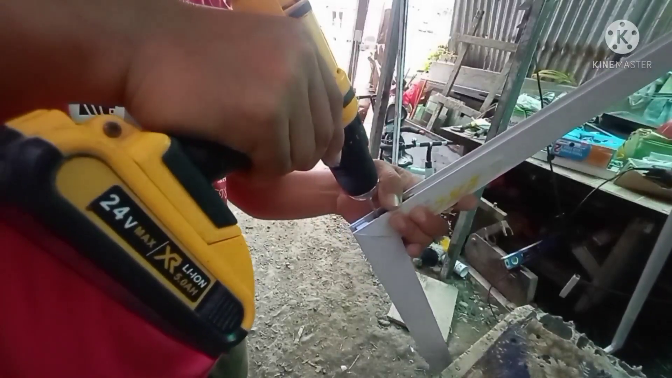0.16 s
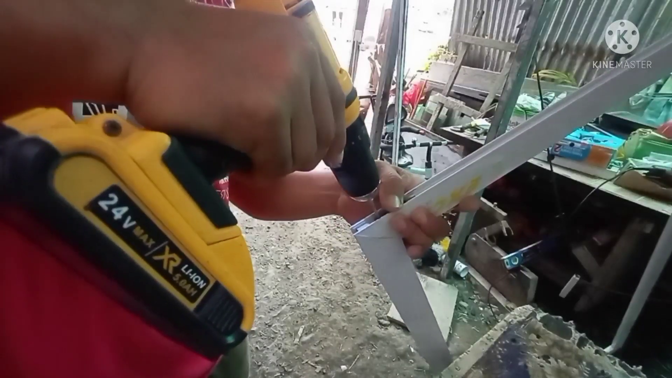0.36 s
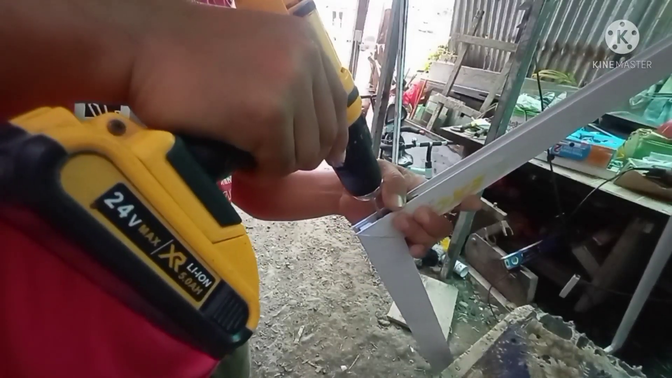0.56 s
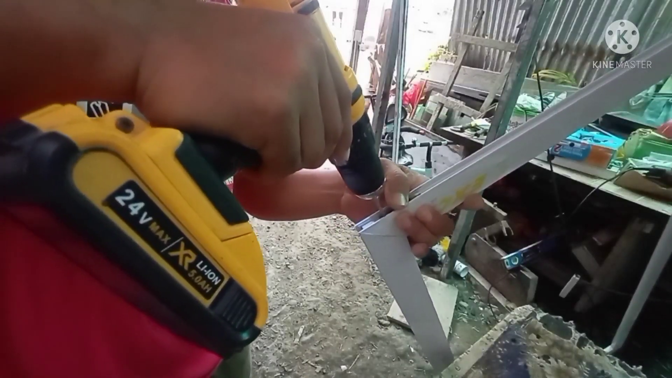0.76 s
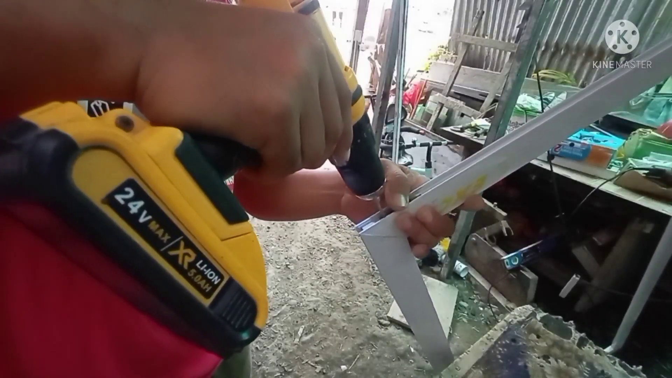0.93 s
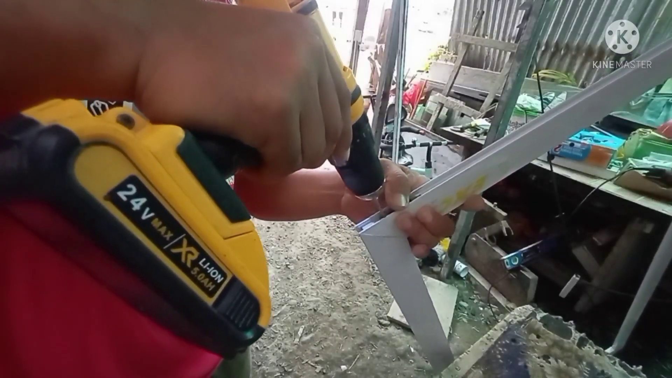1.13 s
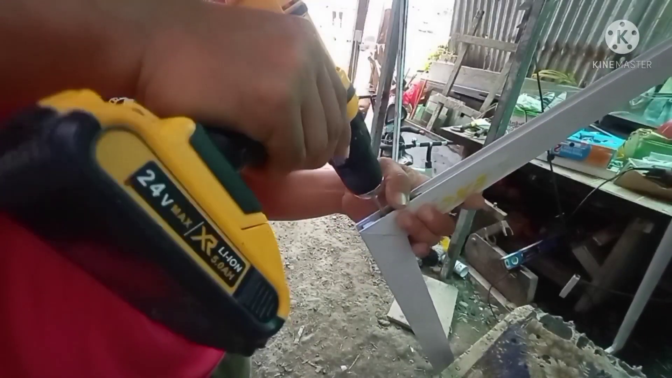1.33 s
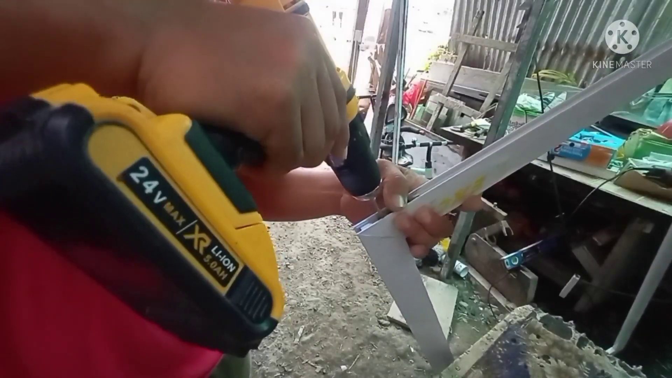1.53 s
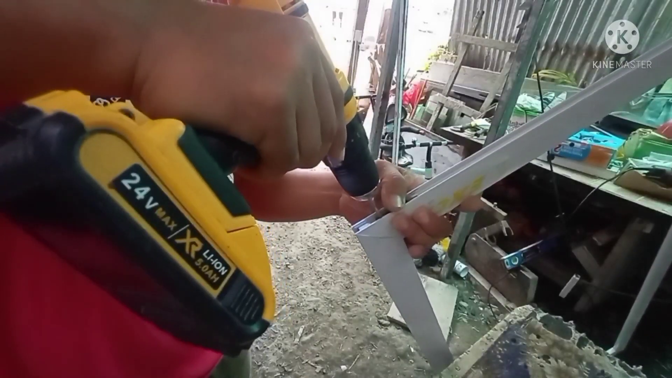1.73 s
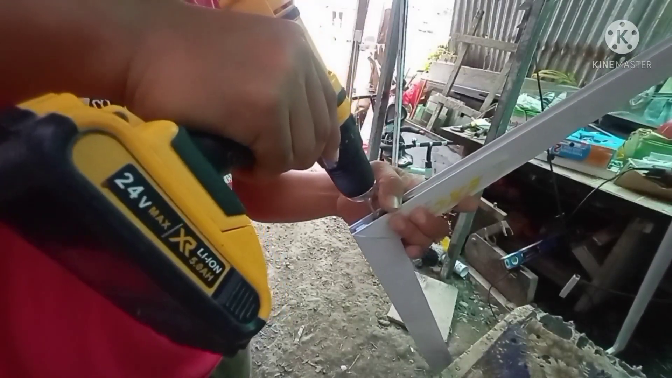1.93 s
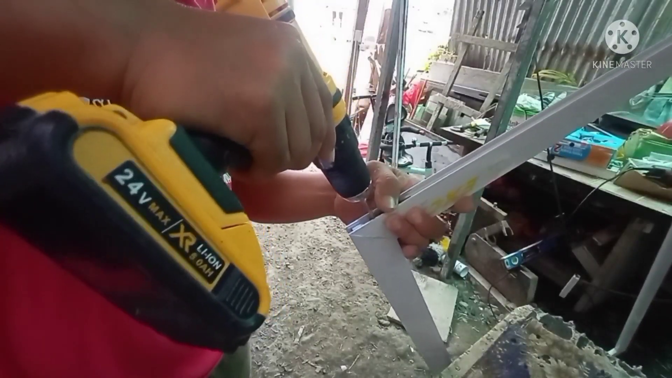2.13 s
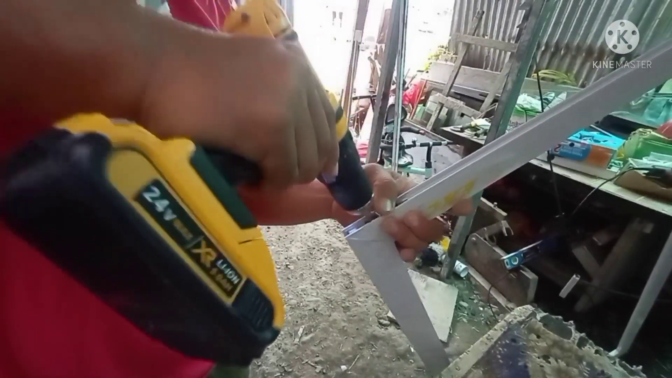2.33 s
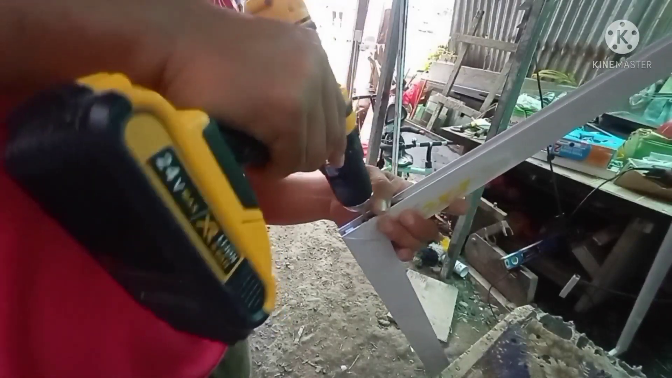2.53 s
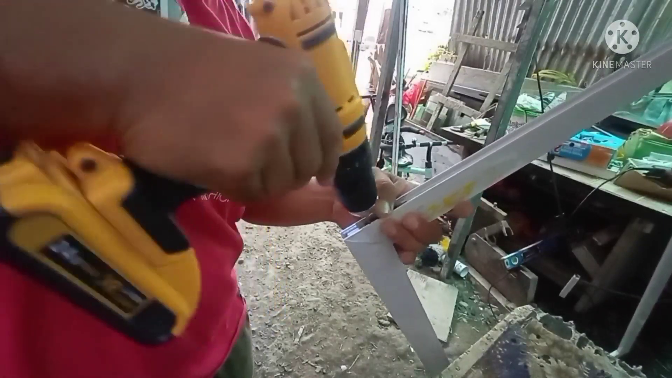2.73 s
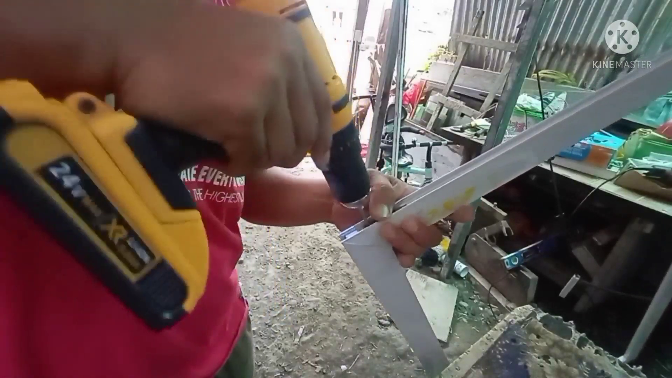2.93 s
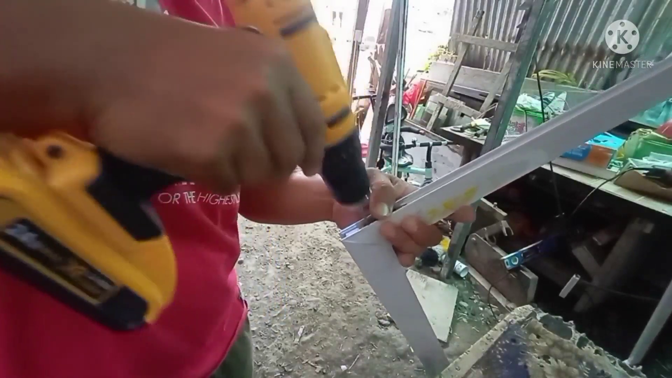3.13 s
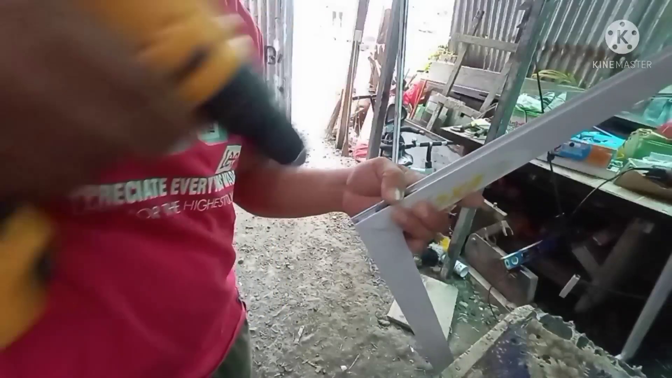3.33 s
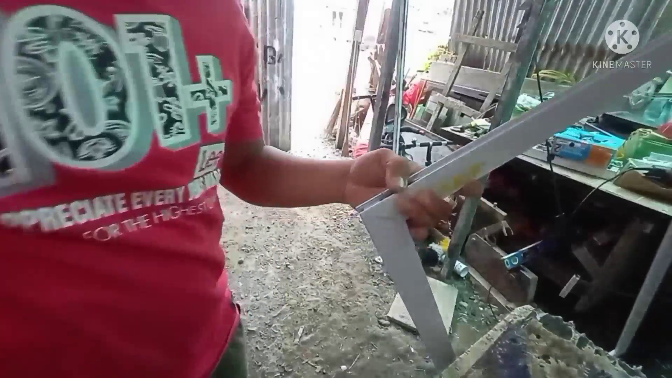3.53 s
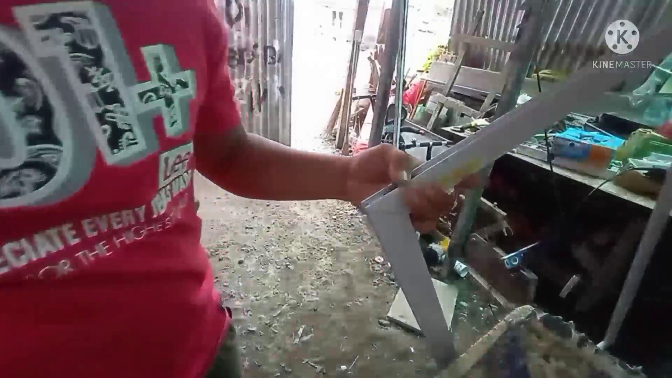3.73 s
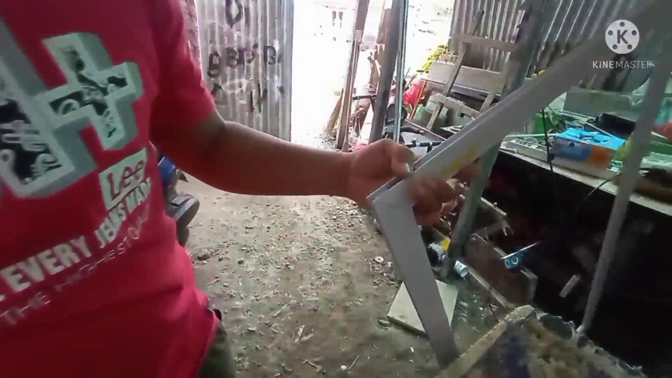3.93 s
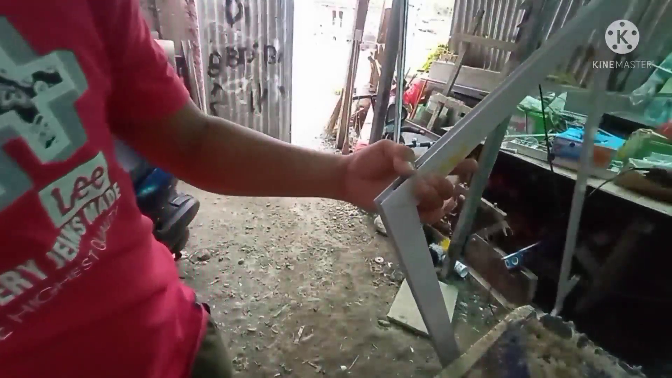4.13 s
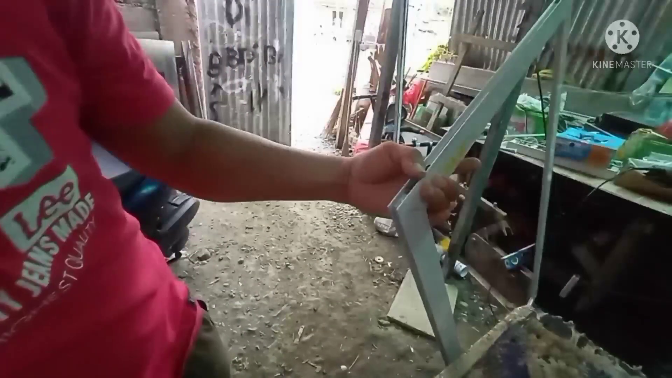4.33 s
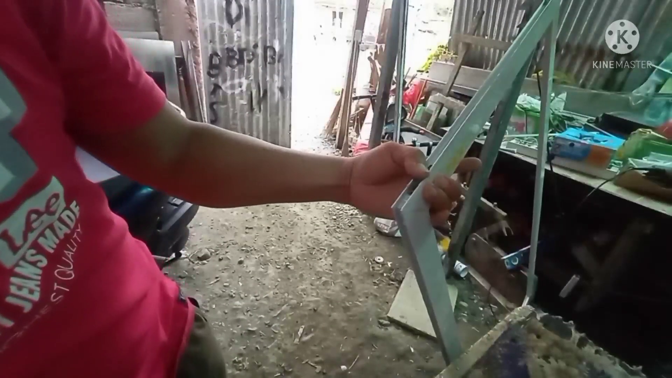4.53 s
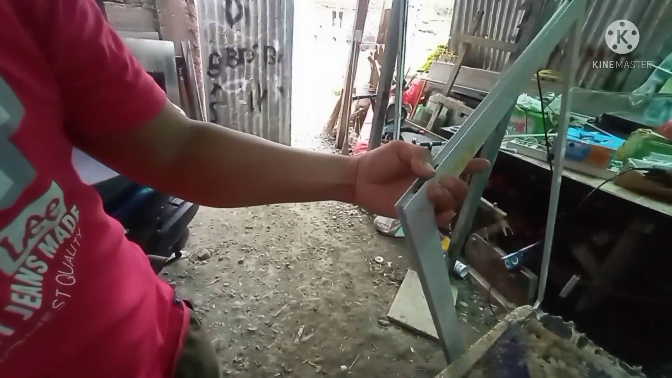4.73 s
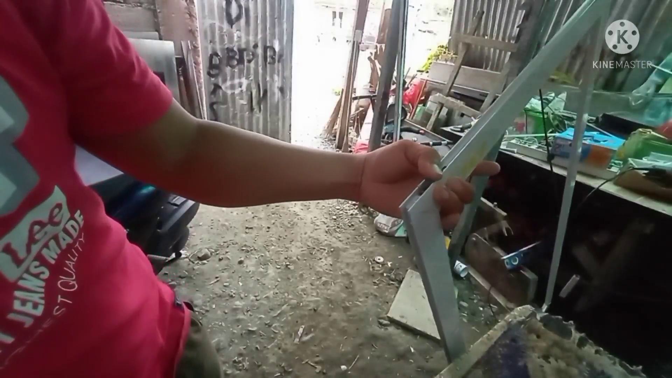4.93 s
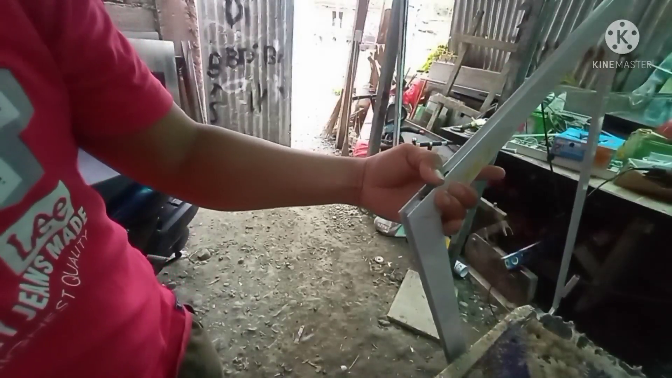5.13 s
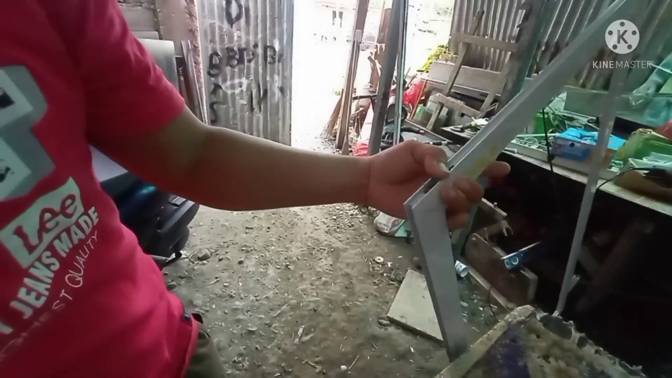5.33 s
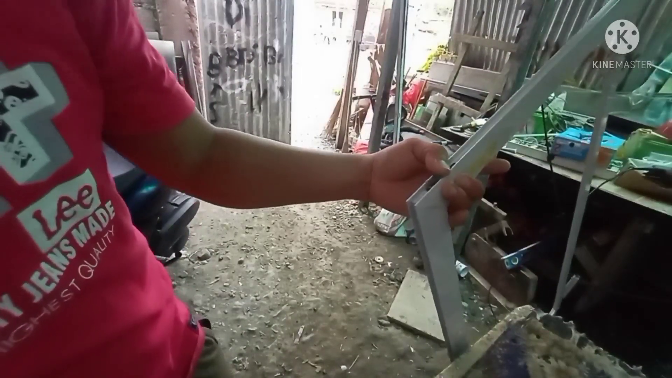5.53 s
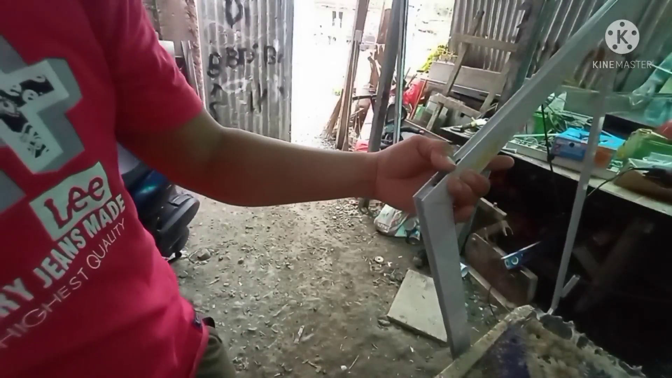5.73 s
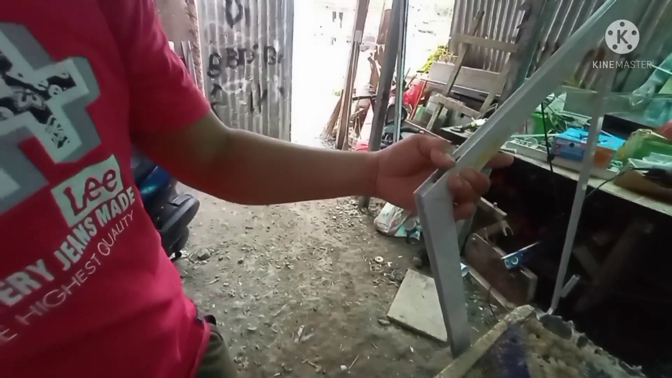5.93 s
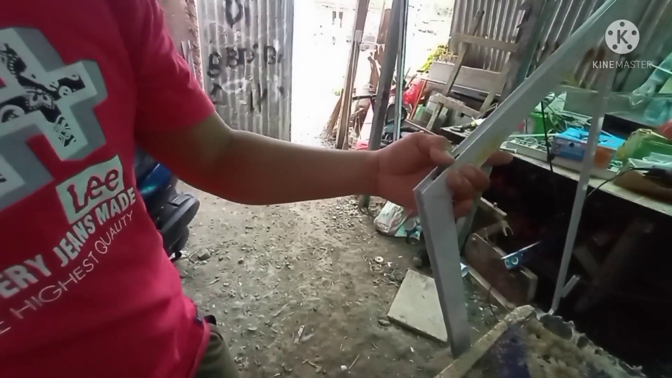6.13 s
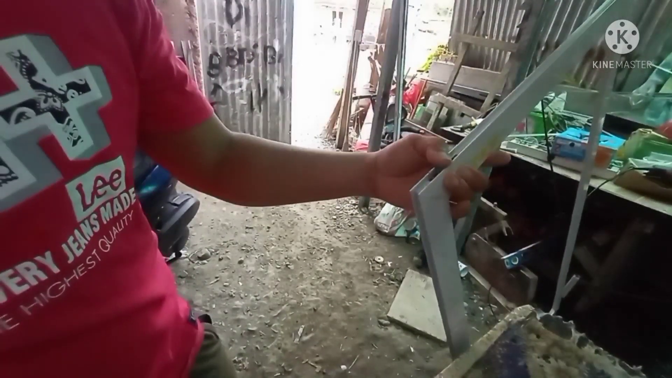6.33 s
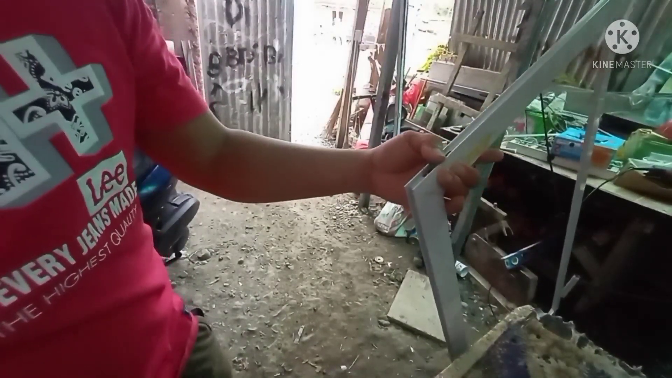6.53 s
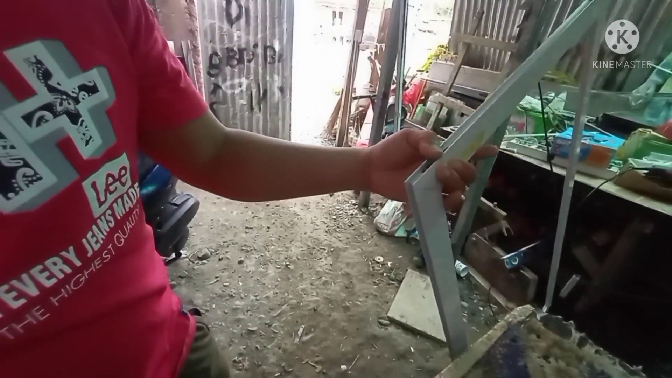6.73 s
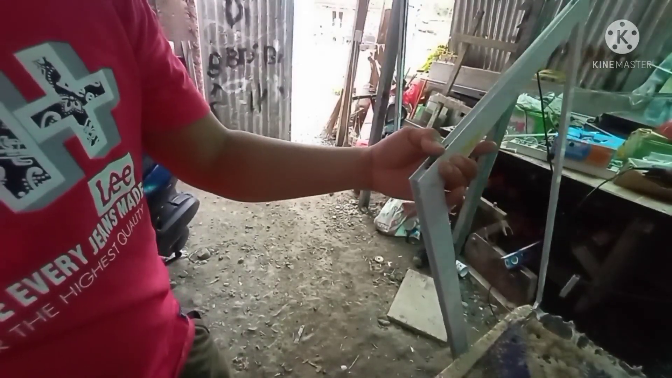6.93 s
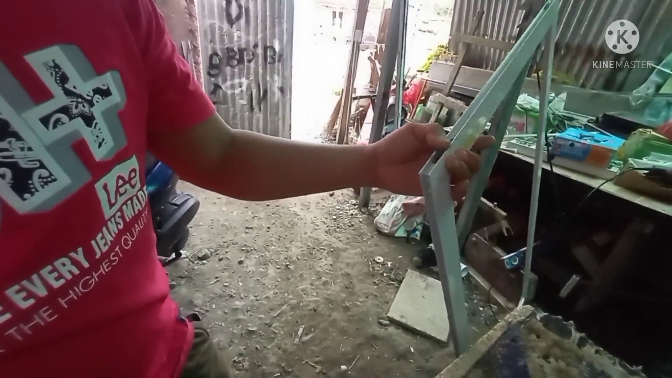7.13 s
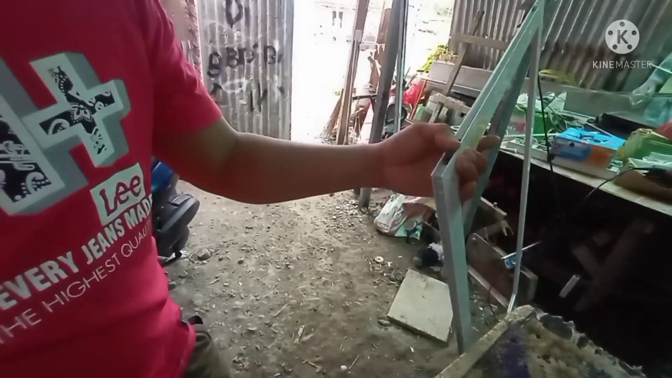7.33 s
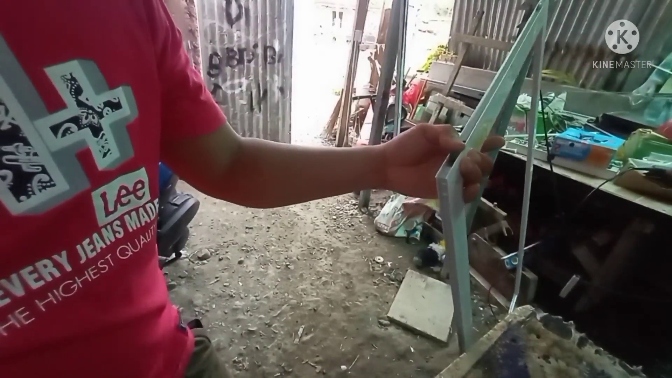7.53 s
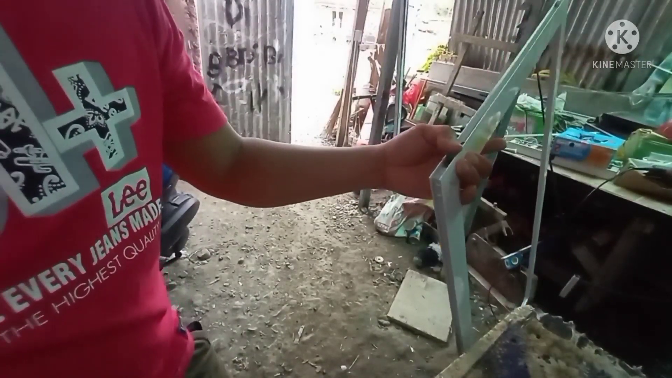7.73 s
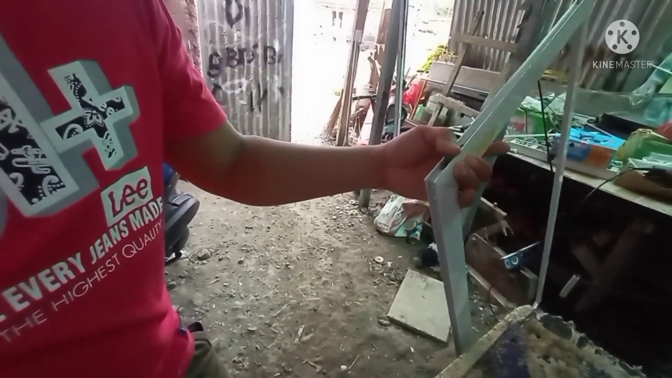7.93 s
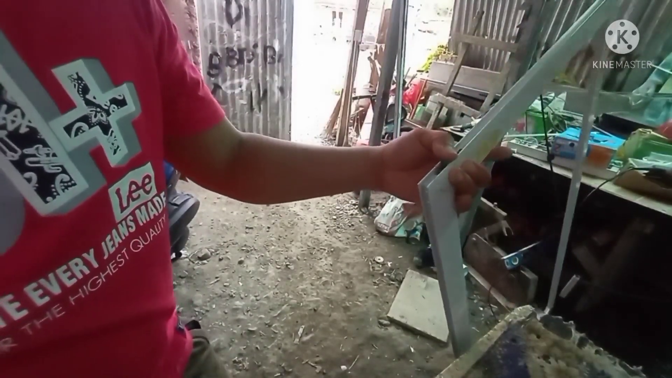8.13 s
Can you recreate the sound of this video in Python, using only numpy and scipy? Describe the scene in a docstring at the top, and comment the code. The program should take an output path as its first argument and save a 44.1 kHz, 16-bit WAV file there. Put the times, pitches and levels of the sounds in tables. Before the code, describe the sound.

Close, harsh drilling into aluminium runs three seconds and brakes abruptly; afterward quiet handling brings hollow knocks, a heavy bench thud and rattly metallic clicks.

```python
"""A cordless drill bores into an aluminium frame in an open workshop: gear and motor tones over chip noise.
It sags twice under load, runs down and brakes with a clack, a noisy crack ringing damped modes.
The frame is then turned by hand: its foot knocks and thuds on the bench, hand and cloth tick faintly,
its loose corner clicks, short resonant rubs swell, slips scrape it into ringing, filtered grains rustle.
One close microphone hears it all over a faint outdoor hush of filtered noise."""
import sys
import numpy as np
from scipy import signal
from scipy.fft import rfft, irfft, next_fast_len
from scipy.io import wavfile
from scipy.ndimage import uniform_filter1d

SR = 44100
rng = np.random.default_rng(int(sys.argv[2]) if len(sys.argv) > 2 else 0)


def file_out(sig):
    """Save sig as 16-bit WAV at sys.argv[1]."""
    # one column per channel
    cols = np.atleast_2d(sig).T
    # limit, then scale
    lim = np.clip(cols, -1, 1)
    pcm = np.round(lim * 32767).astype(np.int16)
    wavfile.write(sys.argv[1], SR, pcm)


N = 360738
TIME = np.arange(N) / SR


def amp(db):
    """Level: decibels become an amplitude gain."""
    return 10 ** (np.asarray(db) / 20)


def unit(x):
    """Normalisation: scales a signal to rms 1."""
    return x / np.sqrt(np.mean(x ** 2) + 1e-20)


def read(points, hz):
    """Spectral envelope: interpolates a table in dB along log frequency."""
    f, db = np.transpose(points)
    return np.interp(np.log(hz + 1), np.log(f + 1), db)


def curves(rows):
    """Time envelope: interpolates each column of a time table, sample by sample."""
    s, *columns = np.transpose(rows)
    return [np.interp(TIME, s, c) for c in columns]


def swell(s, length):
    """Gaussian envelope: a smooth rise and fall around s seconds, top 1."""
    return np.exp(-((TIME - s) / length) ** 2)


def add(mix, s, sound):
    """Superposition: mixes a sound in at s seconds."""
    part = mix[max(round(s * SR), 0):][:len(sound)]
    part += sound[:len(part)]


def colour(x, *spectra):
    """Linear filtering: shapes a signal by the sum of its spectra in dB; rms 1."""
    size = next_fast_len(len(x))
    hz = np.fft.rfftfreq(size, 1 / SR)
    gain = amp(sum(read(s, hz) for s in spectra))
    return unit(irfft(rfft(x, size) * gain, size)[:len(x)])


def wander(rate_hz):
    """Slow modulation: random drift of rms 1, straight lines between rate_hz knots a second."""
    knots = rng.standard_normal(4096)
    return unit(np.interp(TIME * rate_hz, np.arange(4096), knots))


def grains(per_s, spread_db):
    """Shot noise: a random train of tiny fractures, a few of them large; rms 1."""
    size = amp(spread_db * np.minimum(rng.exponential(1, N), 4))
    struck = rng.random(N) < per_s / SR
    return unit(size * rng.standard_normal(N) * struck)


def resonate(x, hz, width_hz):
    """Damped resonance: a single pole rings at hz; rms 1."""
    pole = np.exp((2j * np.pi * hz - np.pi * width_hz) / SR)
    return unit(signal.lfilter([1], [1, -pole], x).real)


def ripple(size):
    """Modal interference: random peaks and notches, rms 1, of the many modes at one point of contact."""
    return unit(uniform_filter1d(rng.standard_normal(size), size=2))


def workshop(x, wet_db, t60):
    """Reverberation: a short, dense cloud of reflections from bench, floor and tin walls."""
    t = np.arange(SR // 3) / SR
    reflected = (rng.random(len(t)) < .05) * (t > .002)
    taps = rng.standard_normal(len(t)) * reflected * amp(-60 * t / t60)
    tail = signal.oaconvolve(x, taps / np.linalg.norm(taps))[:N]
    return (x + amp(wet_db) * tail) / np.hypot(1, amp(wet_db))


# level of the outdoor air: time [s], level_db [dB]
AIR = [(3.3, -57.5), (3.9, -57.5), (4.6, -55.5), (5.05, -62.5), (5.6, -54.5), (6.3, -58.5), (7.6, -61),
       (8.18, -64)]
# relative spectra of the air and of the hiss: pitch_hz [Hz], level_db [dB]
AIR_SPECTRUM = [(18, -48), (30, -18), (43, -49), (71, 4.5), (97, 2.5), (236, 5.5), (294, -6), (448, 0),
                (996, 0), (1360, 6.5), (1850, -2.5), (3370, -9.5), (6000, -18), (7800, -60), (13200, -120)]
HISS_SPECTRUM = [(3530, -49), (6000, -4), (6490, 17), (7640, 1), (8680, 11), (9350, -44), (11300, -13),
                 (12800, 8), (14700, -11), (16000, -29)]


def hush():
    """Stationary noise: faint, slowly drifting outdoor air over steady microphone hiss."""
    air_db, = curves(AIR)
    air = amp(air_db + 2.6 * wander(rate_hz=3.57)) * colour(rng.standard_normal(N), AIR_SPECTRUM)
    hiss = amp(-69.5) * colour(rng.standard_normal(N), HISS_SPECTRUM)
    return air + hiss


# how the drill's housing radiates a tone: pitch_hz [Hz], level_db [dB]
HOUSING = [(250, -6), (310, -10), (335, 2), (520, -1), (620, -3.5), (660, 0), (720, -1.5), (790, -4.5),
           (870, 3), (980, 4), (1100, -13), (1500, 0), (2600, 5.5), (3100, 1), (4400, 0), (5350, -7.5),
           (5650, -0.5), (6100, -4)]


def whine(turns, speed, lines, flutter_db, flutter_hz):
    """Harmonic radiation: lines of a turning part flutter, and swell as they glide through the housing's modes."""
    out = np.zeros(N)
    on = TIME < 3.35
    for k, db in lines:
        level_db = db + read(HOUSING, round(k) * speed[on]) + flutter_db * wander(flutter_hz)[on]
        phase = 2 * np.pi * (round(k) * turns[on] + rng.random())
        out[on] += amp(level_db) * np.cos(phase)
    return out


def gear_buzz(turns):
    """Periodicity: uneven teeth repeat one rough pattern every third turn, a fine comb of weak lines."""
    order = np.arange(1025)
    teeth = rng.standard_normal(1025) + 1j * rng.standard_normal(1025)
    pattern = irfft(teeth * (order > 9) * (order < 72))
    return unit(np.interp(turns / 3, np.arange(2048) / 2048, pattern, period=1))


# motor speed under the hand's pressure: time [s], speed [turns a second, Hz]
SPEED = [(0, 331.2), (.52, 332.5), (.64, 329.6), (1.13, 327.4), (1.22, 284), (1.32, 256.5), (1.41, 307.7),
         (1.52, 322.6), (1.8, 330.7), (1.96, 332.4), (2.22, 312.3), (2.3, 322.8), (2.38, 314.2),
         (2.68, 314.7), (2.8, 338.5), (3.05, 333), (3.16, 307.2), (3.28, 234)]
# gear chatter: time [s], depth of the throb at each turn of the chuck [0-1]
CHATTER = [(0, .02), (2.1, 0.02), (2.27, 0.1), (2.85, 0.11), (3.28, 0.04)]
# the bit slips and bites: middle_s [s], length_s [s], change of grinding [dB], change of growl [dB]
SLIPS = [(1.15, 0.064, 1, 8.5), (2.22, 0.0079, 4, -13), (2.27, 0.045, 0.5, 11), (2.6, 0.11, 0, 9),
         (2.726, 0.066, -1.5, 6), (2.844, 0.016, -6, -13), (2.95, 0.029, 0.5, 0)]
# relative level of the squeal, on the whole growing as the hole deepens until the bit breaks through:
# time [s], level_db [dB]
SQUEAL = [(0, -33), (1, -26), (1.3, -21.5), (1.9, -25), (2.62, -18.5), (2.8, -34), (3, -28), (3.12, -31),
          (3.2, -35)]
# relative spectra of grinding, its fizzing top and the growl: pitch_hz [Hz], level_db [dB]
GRIND = [(350, -54), (600, -8), (647, -9), (706, -11), (770, -1.5), (877, -9), (967, -1), (1050, -1),
         (1490, -1), (1850, -4.5), (2650, -3.5), (4970, -4.5), (5780, -2), (8000, -4.5), (10400, -36),
         (17600, -120)]
GRIND_TOP = [(4710, -28), (8000, -19), (8780, -5.5), (9360, -6), (11300, -7), (13100, 2), (14000, 5.5),
             (14800, 1), (15700, -5), (16000, -20)]
GROWL = [(40, -60), (120, -66), (220, -9), (330, -2.5), (450, 5), (560, 7.5), (700, 2), (1100, -38)]
# ring of the frame clamped under the bit: pitch_hz [Hz], width_hz [Hz], relative level_db [dB]
CLAMPED = [(1080, 24, -37), (2650, 130, 7), (2690, 280, -14), (3580, 20, 0), (4140, 47, -2)]
# low motor harmonics, and the whistle of fan and magnets: multiple of the motor speed, relative level_db [dB]
MOTOR = [(1, -16), (2, -2.5), (3, -1), (4, -34)]
WHISTLE = [(6, -32), (9, -40), (11, -14), (12, 0), (14, -8), (15, -20.5), (17, 7), (18, 2), (38, -23),
           (40, -15), (41, 1), (43, -15)]
# gear mesh, low and high: multiple of the mesh rate, relative level_db [dB]
MESH = [(1, -4.5), (2, -5.5)]
MESH_HIGH = [(3, -2.5), (4, 4), (5, -5), (7, 8.5), (8, -1)]
FREE_HZ, MESH_PER_TURN = 332, 7 / 3
# base levels at full speed (dB), and what they lose as the motor sags (dB per Hz)
GRIND_DB, GROWL_DB, LOW_WHINE_DB, HIGH_WHINE_DB = -17.5, -44, -34, -40
GRIND_SAG_DB_PER_HZ, GROWL_SAG_DB_PER_HZ = 0.03, 0.1  # the growl loses both
LOW_SAG_DB_PER_HZ, HIGH_SAG_DB_PER_HZ = .08, .1
# the bit is drawn out of the hole, then the trigger is let go and the drive runs down, high whistle first
LIFT_S, LIFT_TAKES_S, LIFT_DB = 3.06, 0.074, -2
RELEASE_S, RUN_DOWN_DB_PER_S, WHINE_DOWN_DB_PER_S, WHISTLE_DOWN_DB_PER_S = 3.187, 220, 190, 420
BRAKE_S, BRAKE_LENGTH_S, BRAKE_DB = 3.205, 0.036, -28.5


def drill():
    """Order-locked sound: motor and gears sing while the bit tears chips, noise modulated by motor and chuck."""
    speed, = curves(SPEED)
    squeal_db, = curves(SQUEAL)
    chatter, = curves(CHATTER)

    # grinding, growl and whine weaken as the motor sags, and die away once the trigger is let go
    sag = FREE_HZ - speed
    coasting = np.maximum(TIME - RELEASE_S, 0)
    run_down_db = -RUN_DOWN_DB_PER_S * coasting
    lift_db = LIFT_DB * np.clip((TIME - LIFT_S) / LIFT_TAKES_S, 0, 1)
    cut_db = lift_db - GRIND_SAG_DB_PER_HZ * sag + run_down_db
    grind_db = GRIND_DB + cut_db
    slip_growl_db = sum(db * swell(s, length) for s, length, _, db in SLIPS)
    growl_db = GROWL_DB + cut_db - GROWL_SAG_DB_PER_HZ * sag + slip_growl_db
    low_db = LOW_WHINE_DB - LOW_SAG_DB_PER_HZ * sag - WHINE_DOWN_DB_PER_S * coasting
    high_db = HIGH_WHINE_DB - HIGH_SAG_DB_PER_HZ * sag - WHISTLE_DOWN_DB_PER_S * coasting

    # the chuck makes about one turn for ten of the motor, less evenly
    turns = np.cumsum(speed * (1 + 0.00064 * wander(rate_hz=60))) / SR
    chuck = np.cumsum(speed * (1 + 0.119 * wander(rate_hz=15))) / SR / 10.0
    throb = (1 + 0.21 * np.cos(2 * np.pi * turns)) * (1 + chatter * np.cos(2 * np.pi * chuck))
    bite_db = sum(db * swell(s, length) for s, length, db, _ in SLIPS)
    bite = throb * amp(bite_db + .5 * wander(rate_hz=190))

    chips = bite * (grains(per_s=12000, spread_db=1.5) + rng.standard_normal(N))
    # a hard bite is brighter
    fizz = amp(-14.0 + np.maximum(bite_db, 0)) * colour(chips, GRIND_TOP)
    buzz = amp(-14) * bite * gear_buzz(turns)
    grind = amp(grind_db) * (amp(-5.5) * colour(chips, GRIND) + fizz + buzz)

    # the bit squeals in one narrow band as it rubs the wall of the hole
    rubbing = bite * rng.standard_normal(N)
    narrow = resonate(resonate(rubbing, hz=6030, width_hz=340), hz=5670, width_hz=450)
    squeal = amp(squeal_db - 8 + run_down_db) * narrow

    # the harder the bit chatters, the more the clamped frame rings
    modes = sum(amp(db) * resonate(bite * rng.standard_normal(N), hz, width) for hz, width, db in CLAMPED)
    ring = amp(grind_db) * chatter * modes

    # the growl comes in clumps
    clumps_db = 3 * wander(rate_hz=16)
    growl = amp(growl_db + clumps_db) * colour(grains(per_s=3600, spread_db=1.0), GROWL)

    mesh, mesh_hz = turns * MESH_PER_TURN, speed * MESH_PER_TURN
    low = whine(turns, speed, MOTOR, flutter_db=2.5, flutter_hz=22.39)
    low += whine(mesh, mesh_hz, MESH, flutter_db=4.5, flutter_hz=22.1)
    high = whine(turns, speed, WHISTLE, flutter_db=3.0, flutter_hz=20)
    high += whine(mesh, mesh_hz, MESH_HIGH, flutter_db=-2.0, flutter_hz=29.0)
    tones = amp(low_db) * low + amp(high_db) * high

    # the brake makes the motor's second harmonic groan as it falls
    brake = amp(BRAKE_DB) * swell(BRAKE_S, BRAKE_LENGTH_S) * np.cos(2 * np.pi * 2 * turns)
    running = np.interp(TIME, [3.26, 3.32], [1, 0])
    return running * (grind + squeal + growl + brake + ring + tones)


def blow(spectra, modes, crack_s, ripple_db, tail_db, tail_t60, rise_s):
    """Impact excitation: a snap, a noisy crack, the struck part's modes, a room tail; loudest 3 ms at rms 1."""
    t = np.arange(SR // 2) / SR
    contact = np.transpose([np.arange(160) * 100, ripple_db * ripple(size=160)])
    noise = colour(rng.standard_normal(len(t)), contact, *spectra)
    snap = 1.8 * np.exp(-((t - .0015) / .001) ** 2)
    crack = amp(-60 * t / max(crack_s, .004))
    tail = amp(tail_db - 60 * t / tail_t60)
    sound = noise * (snap + crack + tail)
    # where the blow lands decides how strongly each mode answers
    for (hz, db, t60), weight in zip(modes, rng.uniform(0.24, 0.86, len(modes))):
        sound += weight * amp(db - 60 * t / t60) * np.sin(2 * np.pi * hz * t) * rng.choice([-1, 1])
    sound *= 1 - np.exp(-t / rise_s)
    return sound / np.sqrt(uniform_filter1d(sound ** 2, size=132).max())


# knocks of the foot and the drill's brake: start_s [s], relative level_db [dB], pitch_hz of an added mode [Hz]
KNOCKS = [(3.187, -22, 1173), (3.198, -24.5, 569), (4.097, -20.5, 422), (5.674, -17, 596),
          (5.783, -19, 1170), (6.134, -32, 605), (6.715, -39, 786), (6.915, -33.5, 685),
          (7.845, -29.5, 592), (7.998, -17, 800)]
# thuds through the bench: start_s [s], relative level_db [dB]
THUDS = [(4.105, -19), (5.41, -38), (5.654, -30.5), (5.785, -6.5), (5.942, -30), (6.138, -32), (6.464, -33),
         (6.593, -35.5), (6.7, -35), (6.771, -32), (6.904, -34.5), (7.041, -32.5), (7.856, -35),
         (8.001, -26)]
# relative spectra of a knock and of a thud: pitch_hz [Hz], level_db [dB]
KNOCK = [(100, -46), (280, -59.5), (430, -8), (600, 6.5), (800, 4), (1150, -2), (1700, 0.5), (3000, -50)]
THUD = [(25, -34), (50, -15), (75, -2), (150, -10.5), (240, -8.5), (380, -29), (700, -32), (1500, -50)]
# hollow ring of the frame's foot, and ring of the bench: pitch_hz [Hz], relative level_db [dB], t60_s [s]
FOOT = [(463, 18.5, 0.075), (502, 14, 0.057), (592, 6.5, 0.28), (850, -31, .14), (1066, 5, 0.18),
        (1200, -12, 0.13)]
BENCH = [(81, -10, 0.2), (110.6, 4.5, 0.29), (155, 0.5, 0.26), (237, -4.5, 0.11), (380.5, -10.5, 0.22)]
FOOT_RING_DB = -8.5  # shift of the foot's modes against the crack
KNOCK_CRACK_S, KNOCK_MODE_DB, KNOCK_T60_S, PUSH_S = .042, 19, 0.085, 0.16


def knocks():
    """Modal response: hollow knocks ring the foot's damped modes, thuds the low modes of the bench."""
    out = np.zeros(N)
    for s, db, hz in KNOCKS:
        modes = [(f, level + FOOT_RING_DB, t60) for f, level, t60 in FOOT]
        modes.append((hz, KNOCK_MODE_DB, KNOCK_T60_S))
        sound = blow([KNOCK], modes, KNOCK_CRACK_S, ripple_db=3.0, tail_db=3, tail_t60=0.2, rise_s=0.003)
        add(out, s, amp(db - 4) * sound)
    for s, db in THUDS:
        sound = blow([THUD], BENCH, PUSH_S, ripple_db=-1.5, tail_db=-18, tail_t60=0.62, rise_s=0.01)
        add(out, s, amp(db - 7) * sound)
    return out


# the stopping drill's clack, faint ticks of hand and cloth, and clicks of the frame's loose corner:
# start_s [s], relative level_db [dB], low-mid share [dB], top share [dB], level of the corner mode [dB]
CLICKS = [(3.1876, -12, 0, -13, -10), (3.537, -41, -10, 11, -15), (4.095, -22.5, -4, -35, 11),
          (4.1144, -20.5, 4, -11, -6), (4.406, -30.5, -22, 0, -14), (4.7135, -40, 0, -4, -5),
          (4.8282, -42, -22, -1, -7), (5.1418, -30, 7.5, -3, -2), (5.1605, -29.5, 3, -2, 0),
          (5.3607, -37, -13, -8, -2), (5.3736, -24, -17, -11, 15), (5.6141, -31, -10, -23, 2),
          (5.6623, -23.5, -10, -17, 11), (5.674, -14.5, -15, -18, 22), (5.685, -18, -2, -7, 21),
          (5.739, -13.5, -7, -7, 29), (5.752, -14.5, 1, -10, 29), (5.7834, -15.5, -2.5, -38, 0),
          (5.823, -21.5, 3, -18, 0), (5.886, -18, -9, -8, 29), (5.9343, -13.5, -3.5, -14, 14),
          (6.0327, -28.5, -27, -11, 12), (6.1632, -15, -1, -10, 9), (6.463, -26, 21, -14, 0),
          (6.4746, -18, -22, -5.5, -7), (6.7094, -19, -10, -4, -5), (6.8226, -14.5, -42, -11, 18),
          (6.893, -17, -24, -12, 20), (6.9072, -19, -25, -2, 9), (6.917, -18.5, -22, -17, 9),
          (7.0041, -16, -7, -10, 17), (7.0258, -20, -8.5, -9, 11), (7.0367, -19, -6, -5, 15),
          (7.047, -16.5, -8, -12, 5), (7.1414, -23.5, -35, -17, -1), (7.165, -11, -9, -13, -5),
          (7.204, -13, -9, -10, -6), (7.2192, -17, -10, -15, -3), (7.3294, -17, -16, -17, 3),
          (7.3457, -19, -30, -9, 9), (7.3608, -14.5, -27, -12, -11), (7.3798, -16.5, -14.5, -8, 12),
          (7.4395, -21.5, -19, -11, 15), (7.46, -19.5, -11, -17, 21), (7.9677, -20, -5, -9, 16),
          (8.0023, -11, -11, -8, 4), (8.0376, -20, 4, -20, 28), (8.071, -23.5, -26, -13, 2)]
# relative spectrum of a click, also of a scrape: pitch_hz [Hz], level_db [dB]
CLICK = [(470, -78), (800, -27), (873, -24), (1480, -6.5), (1660, -5), (1900, -3.5), (2630, -7),
         (3420, 3.5), (4340, -5.5), (7080, -2.5), (8550, -13), (9330, -24.5), (11300, -20), (13900, -4.5),
         (16000, -24)]
# ring of the aluminium frame, used by the clicks here and the scrapes below: pitch_hz [Hz],
# relative level_db [dB], t60_s in a click [s]
FRAME = [(1496, -0.5, 0.26), (1720, -12, 0.21), (1973, 6, 0.11), (2360, 3.5, 0.16), (2480, 10.5, 0.053),
         (2880, 0, 0.12), (3100, -26, 0.12), (3580, 5.5, 0.24), (3400, 7, 0.085), (4300, 9.5, 0.043),
         (4410, 7.5, 0.072), (5560, 7, 0.12), (5620, -9.5, 0.7), (6300, 5, 0.13), (7600, -18, 0.13)]
FRAME_RING_DB = -6.5  # shift of the frame's modes against the crack
CRACK_S, CONTACT_RIPPLE_DB, CORNER_HZ, CORNER_T60_S = .048, 6, 3450, 0.046
REBOUND_S, REBOUND_DB = .016, -11.5  # typical gap, and level change at each rebound


def clicks():
    """Repeated impact: the drill's clack, faint hand and cloth ticks, corner clicks, each with two weaker rebounds."""
    out = np.zeros(N)
    for s, db, low_db, top_db, ring_db in CLICKS:
        modes = [(f, level + FRAME_RING_DB, t60) for f, level, t60 in FRAME]
        modes.append((CORNER_HZ, ring_db, CORNER_T60_S))
        tint = [(1700, low_db + 11.0), (3000, 0), (8000, 0), (11000, top_db + 11)]
        for k, gap in enumerate(REBOUND_S * (.5 + rng.random(size=3))):
            sound = blow([CLICK, tint], modes, CRACK_S, CONTACT_RIPPLE_DB,
                         tail_db=7.5, tail_t60=0.17, rise_s=0.00014)
            add(out, s, amp(db - 8 + k * REBOUND_DB) * sound)
            s = s + gap
    return out


# short rubs and groans: middle_s [s], length_s [s], pitch_hz [Hz], level_db before the room [dB]
RUBS = [(3.233, .025, 1290, -42), (4.058, 0.037, 466, -40.5), (4.55, .042, 4000, -55),
        (4.908, 0.04, 448, -52.5), (5.52, 0.047, 440, -55.5), (6.437, 0.037, 1320, -44.5),
        (6.744, 0.051, 212, -42.5), (6.76, 0.079, 793, -51.5), (6.783, .019, 1300, -40),
        (7.061, .033, 934, -53), (7.39, 0.024, 1900, -45), (7.468, 0.04, 3440, -42),
        (7.745, .035, 1470, -49), (8.07, 0.034, 905, -44.5)]
RUB_WIDTH_SHARE = 0.14  # bandwidth of each resonance as a share of its pitch


def rubs():
    """Stick-slip friction: brief rubs, noise swelling and fading in one resonance."""
    out = np.zeros(N)
    for s, length, hz, db in RUBS:
        t = np.arange(-3 * length, 3 * length, 1 / SR)
        width_hz = RUB_WIDTH_SHARE * hz
        voice = resonate(resonate(rng.standard_normal(SR), hz, width_hz), hz, width_hz)[-len(t):]
        add(out, s + t[0], amp(db) * unit(voice) * np.exp(-(t / length) ** 2))
    return workshop(out, wet_db=2.5, t60=0.22)


# the joint scrapes as the frame is swung: middle_s [s], length_s [s], relative level_db [dB]
SCRAPES = [(4.07, 0.14, -42.5), (4.626, 0.22, -55), (5.365, 0.035, -43), (5.725, 0.034, -28),
           (5.875, 0.034, -30), (6.432, 0.056, -41.5), (6.737, 0.023, -26.5), (6.905, 0.15, -33),
           (7.295, .05, -31), (7.41, 0.11, -31.5), (7.762, 0.048, -40.5), (7.876, 0.061, -37)]
# hand and sleeve brush along: middle_s [s], length_s [s], relative level_db [dB]
RUSTLES = [(3.345, 0.034, -55), (3.56, 0.1, -62), (3.964, 0.19, -67), (4.47, 0.25, -57.5),
           (5.46, 0.076, -51.5), (6.737, .04, -52), (7.033, 0.13, -53), (7.36, 0.072, -62),
           (7.906, 0.14, -52.5)]
# relative spectrum of the rustle: pitch_hz [Hz], level_db [dB]
RUSTLE = [(500, 4), (1400, -13.5), (3000, -40), (5500, -3.5), (7500, 13.5), (9500, -17.5), (11500, -7.5),
          (13500, 1.5), (15500, -19)]
RUSTLE_DB = -68  # constant rustle under the strokes
TICKS_PER_S, TICKS_DB, TICK_FADE_S = 34, -4, 0.0065  # ticks' level is against the rustle


def handling():
    """Friction: small slips scrape the frame into ringing; hand and shirt rustle, fingers tick on the metal."""
    swing = sum(amp(db) * swell(s, length) for s, length, db in SCRAPES)
    slips = grains(per_s=1500, spread_db=3)
    ring = np.zeros(N)
    for hz, db, t60 in FRAME:
        # as the contact point moves, the modes take turns
        turn_db = 6 * wander(rate_hz=22)
        # the scraped modes are broader, so they ring shorter than in a click
        ring += amp(db + turn_db) * resonate(slips, hz, width_hz=14 / t60)
    scrape = amp(-11.5) * swing * (unit(ring) + amp(-7.5) * colour(slips, CLICK))

    fibres = grains(per_s=6000, spread_db=3)
    strokes = sum(amp(db) * swell(s, length) for s, length, db in RUSTLES)
    sleeve = (amp(RUSTLE_DB) + strokes) * amp(4.1 * wander(rate_hz=12))
    rustle = sleeve * colour(fibres, RUSTLE)

    fade = np.exp(-1 / (TICK_FADE_S * SR))
    touch = signal.lfilter([1], [1, -fade], rng.random(N) < TICKS_PER_S / SR)
    ticks = amp(TICKS_DB) * sleeve * unit(touch * colour(rng.standard_normal(N), RUSTLE))
    fade_in = np.interp(TIME, [3.25, 3.4], [0, 1])
    return workshop(scrape + rustle + ticks, wet_db=-8, t60=0.24) * fade_in


def scene():
    """Superposition: all sources at one microphone, the same in both channels."""
    mono = hush() + drill() + knocks() + clicks() + rubs() + handling()
    return np.array([mono, mono])


EDGE_HZ = 15650


def record(dry):
    """Band limiting: a linear-phase low-pass, the recorder's upper edge."""
    lowpass = signal.firwin(511, EDGE_HZ, window=("kaiser", 9), fs=SR)
    return signal.oaconvolve(dry, lowpass[None], "same")


dry = scene()
out = record(dry)
file_out(out)
```